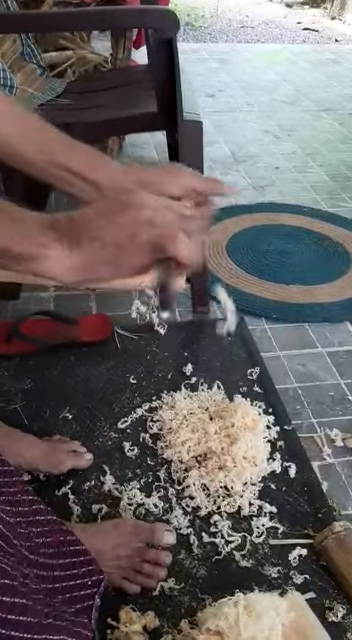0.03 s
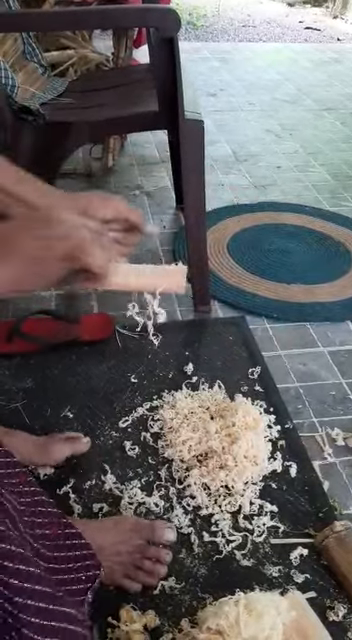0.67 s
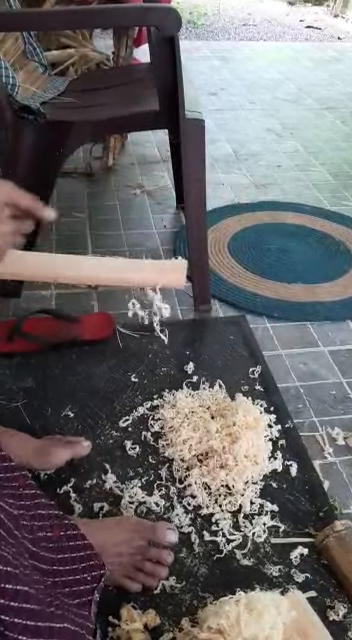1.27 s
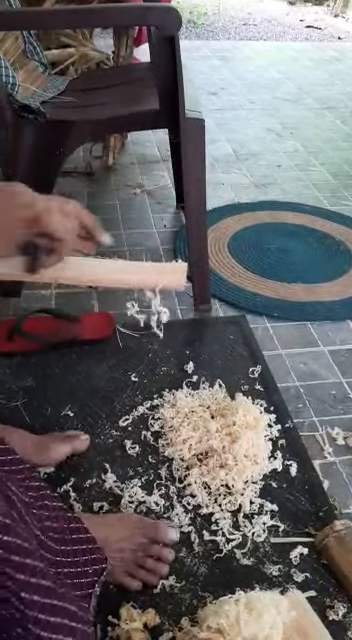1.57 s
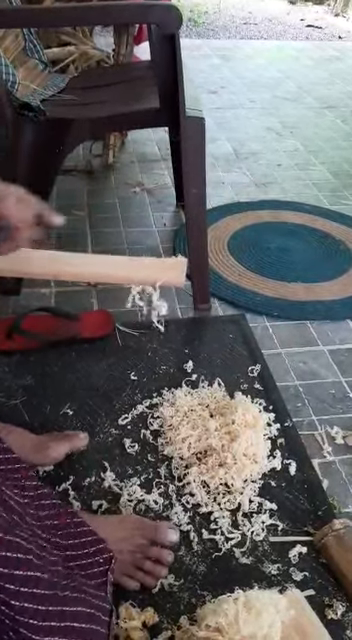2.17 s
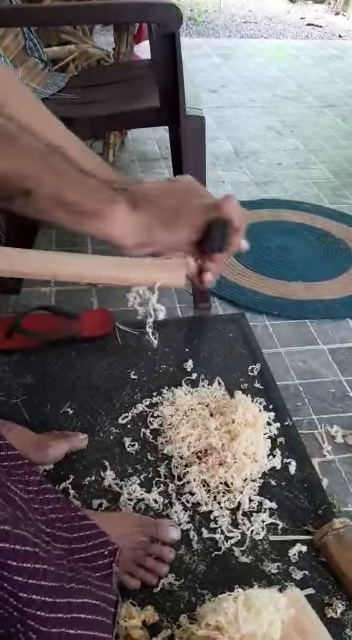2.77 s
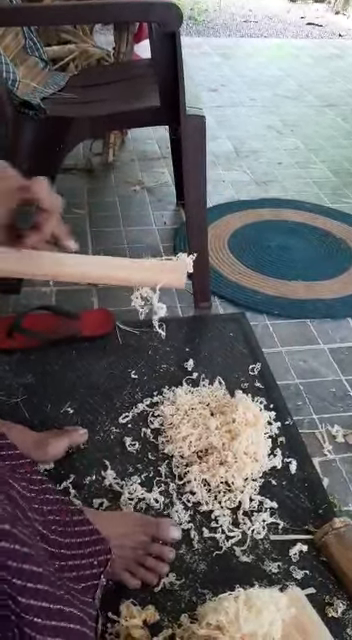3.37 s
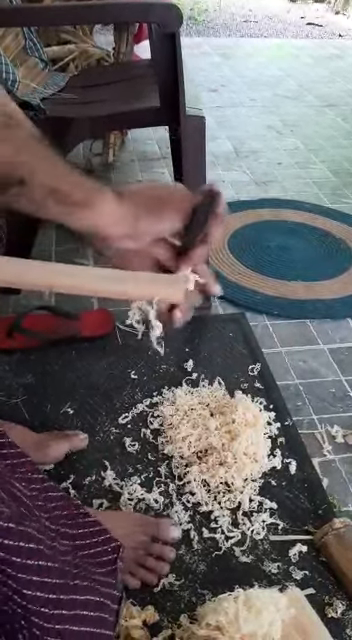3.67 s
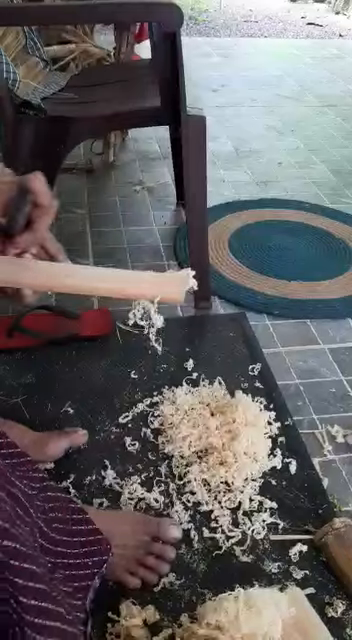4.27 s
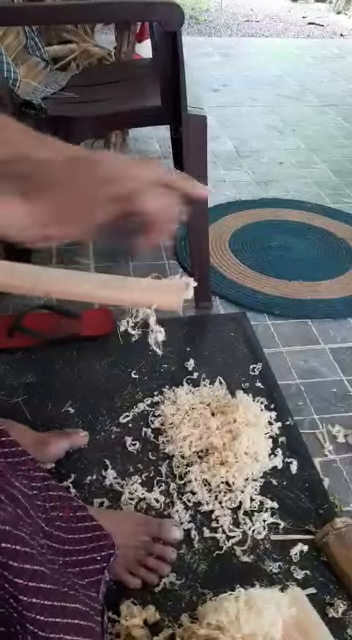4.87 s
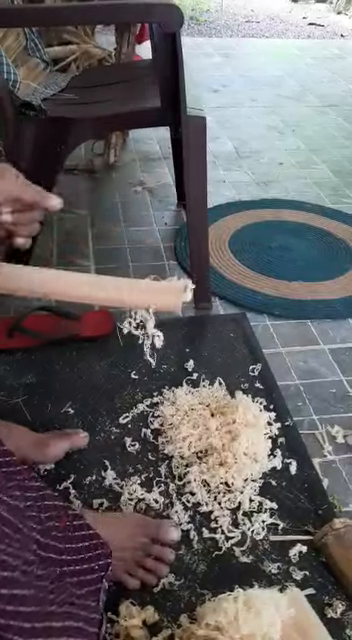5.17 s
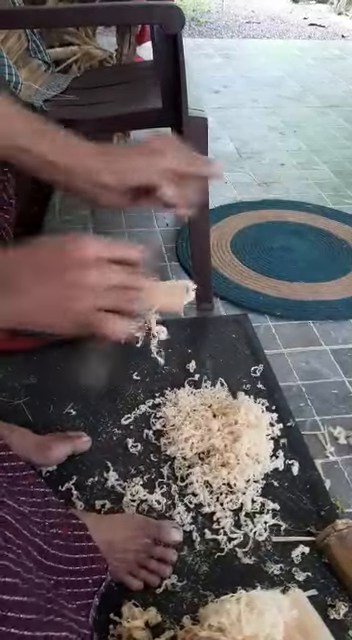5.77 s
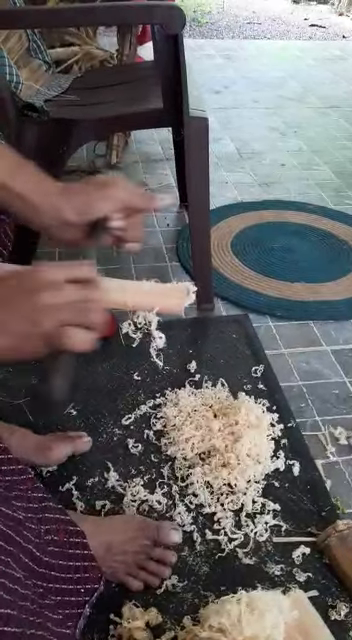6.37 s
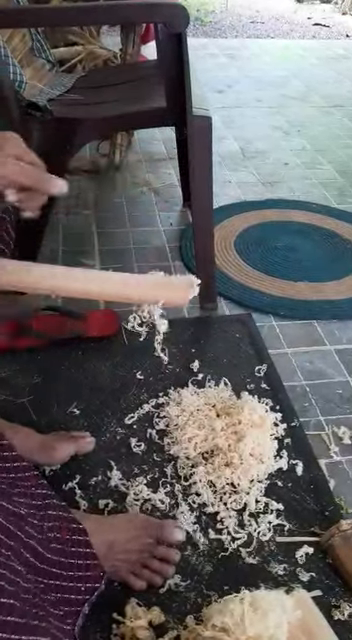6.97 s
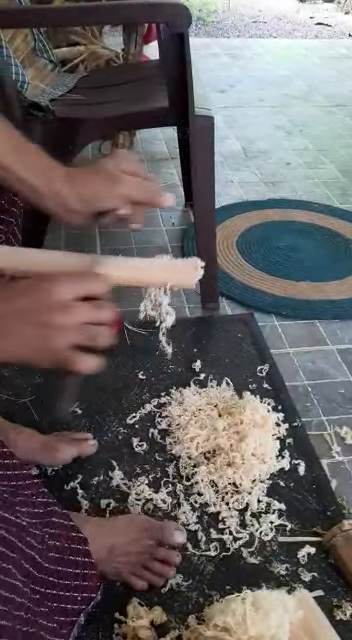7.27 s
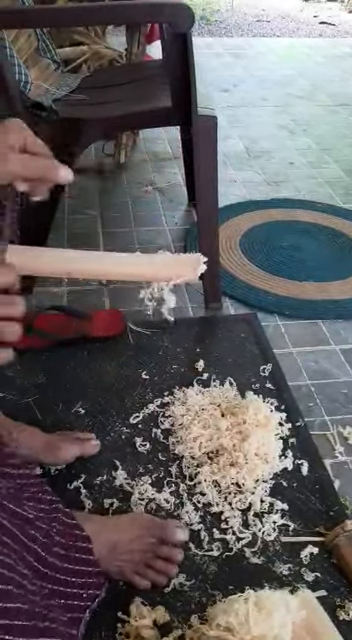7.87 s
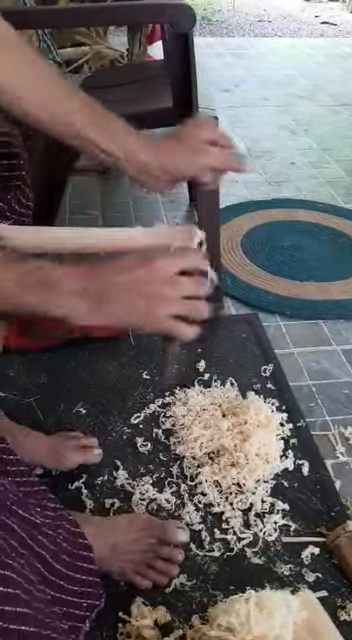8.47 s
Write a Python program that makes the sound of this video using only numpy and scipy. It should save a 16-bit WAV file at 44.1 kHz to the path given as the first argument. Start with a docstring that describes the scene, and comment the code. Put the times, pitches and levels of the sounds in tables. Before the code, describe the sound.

Rhythmic scraping of a blade along bamboo, each push starting with a small knock and often ending in a clatter, over faint outdoor air.

```python
"""A knock's echo dies away into soft outdoor air, a far motor and faint insects.
A blade taps down on a bamboo strip and shaves it, in nine strokes on a tiled porch: each push tears
fibres, a hiss over a woody rasp. Where the blade slips off, the strip rattles on its support.
Friction makes blade or strip sing now and then, and in the last stroke the edge sticks and slips
in one squeal. Roof, walls and tiles add a short echo."""
import sys
import numpy as np
from scipy import signal
from scipy.fft import rfft, irfft, next_fast_len
from scipy.io import wavfile
from scipy.ndimage import uniform_filter1d

SR = 44100
rng = np.random.default_rng(int(sys.argv[2]) if len(sys.argv) > 2 else 0)


def generate_wav(signal):
    """Clip the signal to [-1, 1] and save it as 16-bit WAV at the path in sys.argv[1]."""
    frames = np.transpose(np.atleast_2d(signal))
    scaled = np.clip(frames, -1, 1) * 32767
    pcm = np.round(scaled).astype(np.int16)
    wavfile.write(sys.argv[1], SR, pcm)


N = 375732
TIME = np.arange(N) / SR

# colour of the outdoor air: f/Hz, level/dB
AIR_COLOUR = [(22, -1), (45, -17.5), (75, 2), (150, -4), (220, -6.5), (340, -7), (480, -11.5), (900, -12),
              (2000, -17), (4000, -25), (7500, -29), (12000, -33.5), (16000, -40)]
# a knock's echo dies away at the very start, then soft outdoor air slowly fades: t/s, level/dB
ECHO_THEN_AIR = [(0, -40), (.2, -48.5), (2, -50), (5, -54.5), (8.5, -56)]
# far motor, before its trims: t/s, rumble/dB, drone/dB
MOTOR_LEVELS = [(0.0, -58, -48), (0.9, -53.5, -49.5), (1.28, -59.5, -60), (2.6, -50.5, -56),
                (3.34, -55.5, -48), (4.24, -52, -67.5), (8.5, -68.5, -57.5)]
# insect song: t/s, f/Hz, level/dB
INSECT_SONG = [(0, 8880, -68.5), (3.4, 8900, -69.5), (3.9, 8750, -70.5), (8.5, 8700, -70.5)]
# blade set down on the strip: t/s, level/dB, tick of the edge/dB, brightness/(dB per octave)
BLADE_TAPS = [(.3505, -29, -40, 0.5), (1.3485, -25.5, -46, -1.5), (2.2450, -24, -48, -1),
              (3.1500, -25, -47, -6.5), (4.1310, -23, -49, 0.5), (4.8970, -57, -46.5, 0),
              (5.1865, -21.5, -50, 1), (6.0405, -23.5, -47.5, 0), (6.9140, -30, -48, -6.5),
              (6.9220, -41, -44, 7), (6.9310, -33, -54, -6), (6.9720, -38, -54, -12),
              (7.8390, -19, -47, 3.5)]
# modes of the strip: f/Hz, level/dB
BAMBOO_MODES = [(245, -13.5), (320, -16), (440, -7.5), (585, -6.5), (760, -8), (880, -9.5), (1110, -12.5),
                (1330, -11), (1620, -12), (1950, -9.5), (2330, -6), (3000, -9), (3950, -12)]
# blade strokes, levels relative: start/s, full speed/s, lift-off/s, hiss/dB, rasp/dB, swell/dB,
# easing off/dB, hollow low end/dB, top fizz/dB, blade ring/dB
BLADE_STROKES = [(0.514, 0.761, 0.86, -32, -32, 19.5, 2, 2.5, -1.5, 1),
                 (1.457, 1.72, 1.864, -33.5, -33.5, 26.5, 4, 1.5, -3.5, 0.5),
                 (2.429, 2.623, 2.774, -32.5, -30.5, 26, 6.5, -2.5, -3.5, -0.5),
                 (3.362, 3.551, 3.732, -34, -32, 23, 14, -3.5, -2, -3),
                 (4.286, 4.623, 4.623, -36, -33, 21.5, -4.5, 1, -3, -0.5),
                 (5.312, 5.573, 5.59, -34, -36, 20.5, -1, 0.5, 1, 1),
                 (6.211, 6.376, 6.565, -38, -36, 22, 2.5, 0, -1.5, -1),
                 (7.114, 7.402, 7.46, -37, -36.5, 16.5, 5, -0.5, 0.5, -2.5),
                 (8.112, 8.262, 8.4, -35, -35, 13.5, 6, -6, -5, -4)]
# the blade grazes the strip or snags, levels relative: t/s, length/s, hiss/dB, rasp/dB
BLADE_GRAZES = [(0.377, 0.054, -59, -57), (0.86, 0.016, -39, -25.5), (1.506, .06, -64, -52),
                (1.644, 0.06, -46, -39), (3.18, 0.046, -50.5, -48), (4.39, .05, -79, -48.5),
                (4.71, 0.045, -42.5, -52), (5.568, 0.068, -68, -36), (6.6, 0.026, -62, -41.5),
                (6.932, 0.037, -56, -50), (7.468, 0.028, -58, -46), (7.99, 0.19, -55, -49)]
# colour of the edge's hiss: f/Hz, level/dB
HISS_COLOUR = [(2000, -10.5), (3000, -2), (4300, -1), (5100, -2.5), (5800, -4.5), (7800, -1), (10000, -5.5),
               (12200, -1), (14000, -7.5), (16000, -12)]
# colour of the strip's rasp: f/Hz, level/dB
RASP_COLOUR = [(60, -13), (150, -15.5), (240, -0.5), (480, -0.5), (780, 1), (980, -4.5), (1300, -2.5),
               (1900, 1), (2700, -5.5), (3600, -12), (6000, -17)]
# resonances of blade and strip, hand on top of the blade: f/Hz, width/Hz, boost/dB
BLADE_GRIP_PEAKS = [(483, 210, 3.5), (1100, 32, 0.5), (1333, 58, 8), (2345, 330, 6.5), (4030, 120, 6.5),
                    (4940, 340, 4), (8500, 590, 2)]
# the same, hand on the handle: f/Hz, width/Hz, boost/dB
HANDLE_GRIP_PEAKS = [(240, 62, 5.2), (583, 60, 3.8), (754, 250, 1.5), (1115, 210, 2.9), (1335, 80, 2.8),
                     (2330, 240, 6.2), (2610, 380, 1.9), (4020, 250, 4.3)]
# brief notes of blade or strip: t/s, length/s, f/Hz, level/dB
SUNG_NOTES = [(.57, .14, 4000, -49), (.69, .09, 550, -44), (.861, .014, 2340, -28), (1.55, .18, 4000, -49),
              (2.670, .008, 2320, -33), (3.67, .12, 1100, -46), (4.625, .05, 2320, -43),
              (4.66, .13, 1088, -40), (5.39, .16, 2340, -51), (5.55, .05, 4020, -44), (6.45, .1, 4010, -50),
              (6.50, .1, 250, -52), (7.37, .3, 238, -52), (8.435, .06, 340, -52)]
# the strip bounces on its support: hardest blow/s, level/dB, crack/dB, brightness/(dB per octave),
# gap between blows/s, loss per bounce/dB, blows before, blows after (both rounded)
STRIP_RATTLES = [(.8620, -7.5, -13, -1, 0.013, 2, -0.5, 3), (1.8574, -14.5, -21, 0.5, 0.011, 2.5, 2, 3),
                 (2.7911, -14.5, -26, -1, .0110, 4.5, 2, 2), (3.7290, -32.5, -38, -3, .012, 3, 0, -0.5),
                 (4.7290, -25, -42, -2.5, .012, 3, 1, 0), (5.6185, -8.4, -18.5, -0.1, 0.012, 4.5, 1, 3.5)]
# stick-slip squeal, levels relative: t/s, f/Hz, fundamental/dB, overtones/dB
SQUEAL_CURVE = [(8.111, 5220, -54, -38), (8.119, 5230, -45, -32), (8.127, 5430, -52, -44),
                (8.137, 5250, -49, -36), (8.149, 5100, -41, -41), (8.16, 4650, -38, -44),
                (8.175, 5200, -48, -53), (8.195, 5200, -48, -58)]
# decay of the porch: f/Hz, t60/s
PORCH_DECAY = [(150, 0.68), (450, 0.4), (1000, 0.42), (2500, 0.37), (6000, 0.38), (14000, 0.26)]
# colour of its echo: f/Hz, level/dB
ECHO_COLOUR = [(100, 8.5), (300, -0.5), (520, 2.5), (850, 6), (1500, 4.5), (3500, 2), (7000, -0.5),
               (15000, 5.5)]
# stereo image: f/Hz, left-right correlation
STEREO_LIKENESS = [(60, 0.73), (250, 0.83), (450, 0.83), (700, 0.23), (1300, -0.22), (2400, -0.002),
                   (4400, -0.092), (8000, -0.026), (15000, -0.036)]

# how each layer follows a stroke: share of the swell, share of the easing off, release/(dB per s)
HISS_LAW, RASP_LAW = (0.99, 0.89, 405), (0.75, 0.53, 280)


def from_db(db):
    """Decibels to gain."""
    return 10 ** (np.asarray(db) / 20)


def rms_one(x):
    """Scale to rms 1."""
    return x / np.sqrt(np.mean(x ** 2) + 1e-20)


def in_time(rows):
    """Each column of a curve, at every sample."""
    s, *columns = np.transpose(rows)
    return [np.interp(TIME, s, column) for column in columns]


def at_hz(points, hz):
    """Read a table on a log-frequency axis."""
    known_hz, values = np.transpose(points)
    return np.interp(np.log(hz + 1e-9), np.log(known_hz), values)


def butter(x, hz, kind, order=2):
    """Causal low-, high- or band-pass."""
    sections = signal.butter(order, np.minimum(hz, SR / 2 - 100), kind, fs=SR, output="sos")
    return signal.sosfilt(sections, x + 1e-18)


def delayed(x, lag_s):
    """A later copy."""
    return np.interp(TIME - lag_s, TIME, x, left=0)


def drift(rate_hz):
    """Smooth random wander of rms 1."""
    steps = np.arange(0, N / SR + 1, 1 / (2 * rate_hz))
    return rms_one(np.interp(TIME, steps, rng.standard_normal(N // 4)[:len(steps)]))


def narrow_noise(hz, width_hz):
    """A tone whose strength and phase wander; rms 1."""
    phase = 2 * np.pi * np.cumsum(hz + np.zeros(N)) / SR
    return drift(width_hz) * np.cos(phase) + drift(width_hz) * np.sin(phase)


def coloured(pair, colour, peaks=()):
    """EQ two unrelated signals and spread them as mid and side; rms 1."""
    size = next_fast_len(pair.shape[1], True)
    hz = np.fft.rfftfreq(size, 1 / SR)
    boost_db = sum(db / (1 + (2 * (hz - centre) / width) ** 2) for centre, width, db in peaks)
    mid, side = rfft(pair, size) * from_db(at_hz(colour, hz) + boost_db) * (hz > 15)
    alike = np.clip(at_hz(STEREO_LIKENESS, hz), -1, 1)
    stereo = np.sqrt(1 + alike) * mid + np.sqrt(1 - alike) * side * [[1], [-1]]
    return rms_one(irfft(stereo, size)[:, :pair.shape[1]])


def echo_then_air(waver_db=0.5):
    """One dark noise: a knock's echo dies away at the very start, then soft outdoor air slowly fades."""
    gain = from_db(in_time(ECHO_THEN_AIR)[0] + waver_db * drift(5.6))
    return gain * coloured(rng.standard_normal((2, N)), AIR_COLOUR)


def far_motor(rumble_trim_db=-1.0, drone_trim_db=-1.5):
    """A distant motor: a low rumble under an unsteady drone."""
    rumble_db, drone_db = in_time(MOTOR_LEVELS)
    rumble = from_db(rumble_db + rumble_trim_db) * narrow_noise(hz=69, width_hz=24)
    drone = from_db(drone_db + drone_trim_db) * narrow_noise(hz=209.8, width_hz=12)
    return rumble + drone


def insects():
    """A thin, high band of insect song, separate on each side."""
    hz, level_db = in_time(INSECT_SONG)
    return from_db(level_db) * np.array([narrow_noise(hz, width_hz=400) for side in range(2)])


def blows(rows, soft_hz, low_cut_hz, crack_band_hz, crack_s, floor_echo, uneven_db, bend_lag_s, t60_s):
    """Each blow cracks and rings the strip; high modes die faster, t60_s holds at 700 Hz."""
    hz, mode_db = np.transpose(BAMBOO_MODES)[:, :, None]
    octaves, t = np.log2(hz / 700), TIME[:int(0.2 * SR)]
    body, clicks = np.zeros((2, 2, N))
    for s, level_db, crack_db, brightness in rows:
        at = round(s * SR)
        detune, *uneven = rng.standard_normal((3, *hz.shape))
        loaded_hz = hz * (1 + 0.03 * detune)   # the hands load the strip anew at each blow
        # bending waves are dispersive: low modes arrive later, depending on where the blow lands
        arrival_s = rng.uniform(0.41, 1, hz.shape) * bend_lag_s * np.sqrt(hz[0] / hz)
        age = np.maximum(t - arrival_s, 0)
        decay = np.exp(-np.log(1000) * age * 2 ** (octaves / 2) / t60_s)
        modes = np.sin(2 * np.pi * loaded_hz * age) * decay
        strengths = from_db(level_db + mode_db + brightness * octaves + uneven_db * np.array(uneven))
        body[:, at:at + len(t)] += (strengths * rng.choice([-1, 1], hz.shape) * modes).sum(axis=1)
        clicks[:, at] = from_db(crack_db)
    body = butter(butter(body, soft_hz, "low"), low_cut_hz, "high")
    burst = signal.lfilter([1], [1, -np.exp(-1 / (crack_s * SR))], clicks + 1e-18)
    left, right = body + butter(burst * rng.standard_normal((2, N)), crack_band_hz, "band")
    # the strip lies slightly to the left; the tiles throw each blow back a moment later
    return np.array([left + floor_echo * delayed(left, lag_s=0.002945),
                     delayed(right, lag_s=0.00012) + floor_echo * delayed(right, lag_s=0.003366)])


def blade_taps():
    """The blade lands on the strip: a dull knock with a bright tick of the edge."""
    return blows(BLADE_TAPS, soft_hz=1150, low_cut_hz=300, crack_band_hz=[2200, 13000], crack_s=0.0059,
                 floor_echo=0.21, uneven_db=2.0, bend_lag_s=0.00757, t60_s=0.025)


def stroke_db(start_s, full_s, lift_s, swell_db, easing_db, law, bite_db_per_s=478):
    """The edge bites, swells as the arm gathers speed, eases towards the strip's end and lifts off."""
    swell_share, easing_share, release_db_per_s = law
    to_go = np.clip((full_s - TIME) / (full_s - start_s), 0, 1) ** 1.286   # climbs fast, levels off
    past = np.clip((TIME - full_s) / (lift_s - full_s), 0, 1)
    attack_db = bite_db_per_s * np.maximum(start_s - TIME, 0)
    release_db = release_db_per_s * np.maximum(TIME - lift_s, 0)
    return -swell_share * swell_db * to_go - easing_share * easing_db * past ** 2 - attack_db - release_db


def contact():
    """Envelopes of hiss and rasp over all strokes and grazes."""
    hiss, rasp = np.zeros((2, N))
    for start_s, full_s, lift_s, hiss_db, rasp_db, swell_db, easing_db, *_ in BLADE_STROKES:
        hiss += from_db(hiss_db + stroke_db(start_s, full_s, lift_s, swell_db, easing_db, HISS_LAW))
        rasp += from_db(rasp_db + stroke_db(start_s, full_s, lift_s, swell_db, easing_db, RASP_LAW))
    for s, length_s, hiss_db, rasp_db in BLADE_GRAZES:
        touch = np.exp(-(2 * (TIME - s) / length_s) ** 2)
        hiss += from_db(hiss_db) * touch
        rasp += from_db(rasp_db) * touch
    return hiss, rasp


def fibres(per_s, spread_db, friction):
    """Fibres snap at random with uneven sizes, over smooth friction."""
    snaps = (rng.random(N) < per_s / SR) * from_db(spread_db * np.minimum(rng.exponential(1, N), 4))
    return rms_one(snaps * rng.standard_normal((2, N))) + friction * rng.standard_normal((2, N))


def gripped(friction, colour, regrip_s=5.0):
    """The hand damps some resonances and frees others; it changes its hold once."""
    before, after = np.split(friction, [int(regrip_s * SR)], axis=1)
    return np.hstack([coloured(before, colour, BLADE_GRIP_PEAKS),
                      coloured(after, colour, HANDLE_GRIP_PEAKS)])


def blade_tilt():
    """The tilt holds through each stroke: gains of low end, top fizz and blade ring."""
    held = [(s, *row[-3:]) for start_s, _, lift_s, *row in BLADE_STROKES for s in (start_s, lift_s)]
    return from_db(in_time(held))


def scrape(judder_db=0.5, grain_db=0.82, hiss_trim_db=3.0):
    """The edge hisses and the strip rasps, both shaken by the judder of the blade."""
    hiss_gain, rasp_gain = contact()
    judder = from_db(judder_db * drift(170) + grain_db * drift(30))
    hiss = gripped(judder * fibres(per_s=14000, spread_db=2.5, friction=1.52), HISS_COLOUR)
    rasp = gripped(judder * fibres(per_s=6000, spread_db=2.0, friction=1.6), RASP_COLOUR)
    hollow, fizz, blade_ring = blade_tilt()
    rasp += (hollow - 1) * butter(rasp, hz=840, kind="low", order=1)
    hiss += (fizz - 1) * butter(hiss, hz=8850, kind="high", order=1)
    cut = from_db(hiss_trim_db) * hiss_gain * hiss + rasp_gain * rasp
    return cut + (blade_ring - 1) * butter(cut, hz=[2130, 2520], kind="band", order=1)


def shifting_resonances(x, depth_db, onset_hz, size=512):
    """As the contact travels, narrow treble resonances come and go within hundredths of a second."""
    hz, _, frames = signal.stft(x, SR, nperseg=size)
    patches = rng.standard_normal(frames.shape[1:])
    patches = uniform_filter1d(uniform_filter1d(patches, size=3, axis=0), size=5, axis=1)
    gain = from_db(depth_db * (hz / (hz + onset_hz))[:, None] * rms_one(patches))
    gain /= np.sqrt(np.mean(gain ** 2, axis=1, keepdims=True))
    return signal.istft(frames * gain, nperseg=size)[1][:, :N]


def singing(waver_hz=11, flutter_db=6.0):
    """Friction feeds one mode of blade or strip for a moment."""
    tone = np.zeros(N)
    wander = 2 * np.pi * np.cumsum(waver_hz * drift(60)) / SR
    for s, length_s, hz, level_db in SUNG_NOTES:
        near = np.abs(TIME - s) < 2 * length_s
        swell = np.exp(-(2 * (TIME[near] - s) / length_s) ** 2)
        phase = 2 * np.pi * hz * TIME[near] + wander[near]
        tone[near] += from_db(level_db) * swell * np.sqrt(2) * np.sin(phase)
    tone *= from_db(flutter_db * drift(50))
    return np.array([tone, delayed(tone, lag_s=0.00007)])


def strip_rattles(build_db=1.5, crack_loss_db=3):
    """The strip springs back and bounces: evenly spaced blows build to the hardest and die away."""
    bounces = []
    for s, level_db, crack_db, brightness, gap_s, loss_db, before, after in STRIP_RATTLES:
        for k in range(-round(before), round(after) + 1):
            bounces.append((s + k * gap_s, level_db + min(build_db * k, -loss_db * k),
                            crack_db + min(build_db * k, -crack_loss_db * k), brightness))
    knocks = blows(bounces, soft_hz=2810, low_cut_hz=194, crack_band_hz=[600, 3900], crack_s=0.0054,
                   floor_echo=0.14, uneven_db=2.5, bend_lag_s=0.00582, t60_s=0.031)
    return knocks * from_db([[0.6], [-0.9]])   # panned a touch left


def squeal(jitter=0.022, flutter_db=3.5, third_db=-3, trim_db=-0.5, fade_db_per_s=1200):
    """The edge sticks and slips thousands of times a second: three unsteady harmonics."""
    hz, first_db, upper_db = in_time(SQUEAL_CURVE)
    phase = 2 * np.pi * np.cumsum(hz * (1 + jitter * drift(700))) / SR
    overtones = np.sin(2 * phase) + from_db(third_db) * np.sin(3 * phase)
    tone = from_db(first_db) * np.sin(phase) + from_db(upper_db) * overtones
    outside_s = np.abs(TIME - np.clip(TIME, SQUEAL_CURVE[0][0], SQUEAL_CURVE[-1][0]))
    fade_db = fade_db_per_s * np.minimum(outside_s, 0.5)
    tone *= np.sqrt(2) * from_db(trim_db + flutter_db * drift(120) - fade_db)
    return np.array([tone, delayed(tone, lag_s=0.000204)])


def porch(send, build_s=0.0024):
    """Diffuse echoes from roof, walls and tiles, fed by the right channel; the treble dies first."""
    t = TIME[:SR]
    noise = coloured(rng.standard_normal((2, SR)), ECHO_COLOUR)
    spectrum, hz = rfft(noise), np.fft.rfftfreq(SR, 1 / SR)
    edges_hz = np.geomspace(40, SR / 2, 13)
    tail = np.zeros((2, SR))
    for low, high in zip(edges_hz, edges_hz[1:]):
        band = irfft(spectrum * (hz >= low) * (hz < high), SR)
        tail += band * np.exp(-np.log(1000) * t / at_hz(PORCH_DECAY, np.sqrt(low * high)))
    tail = rms_one(tail * (1 - np.exp(-t / build_s))) / np.sqrt(SR)
    return signal.fftconvolve(send[1:], tail, axes=1)[:, :N]


def scene():
    """Taps, strokes and rattles up front with their porch echo, the outdoor bed behind."""
    shaving = shifting_resonances(scrape(), depth_db=3.5, onset_hz=1110)
    tones = singing() + squeal()
    taps, rattles = blade_taps(), strip_rattles()
    send = from_db(-6) * shaving + from_db(-13) * tones + from_db(-1.5) * taps + from_db(-3) * rattles
    return taps + shaving + tones + rattles + porch(send) + echo_then_air() + far_motor() + insects()


def record(dry, ceiling=0.8, top_hz=15850):
    """The microphone loses the deepest bass and rounds the hardest knocks; the top is cut steeply."""
    thinned = butter(dry, hz=36.8, kind="high", order=3)
    rounded = ceiling * np.tanh(thinned / ceiling)
    return signal.sosfilt(signal.ellip(12, 0.1, 80, top_hz, fs=SR, output="sos"), rounded)


dry = scene()
out = record(dry)
generate_wav(out)
```